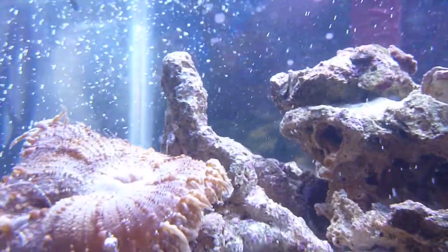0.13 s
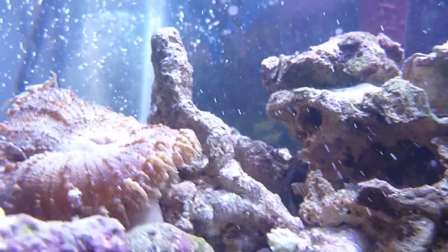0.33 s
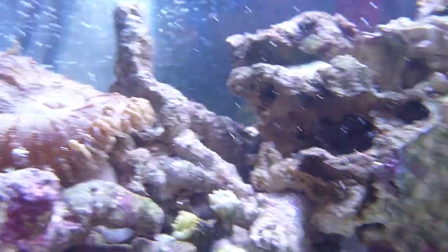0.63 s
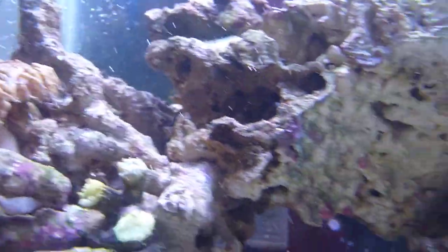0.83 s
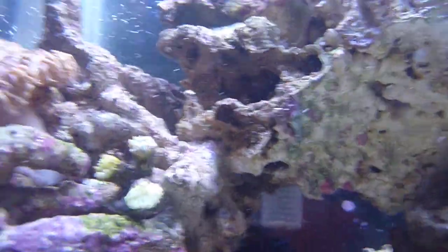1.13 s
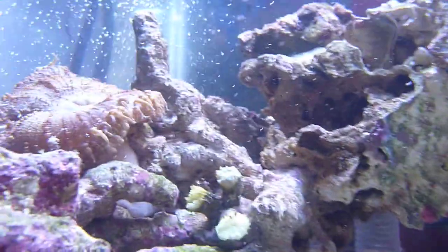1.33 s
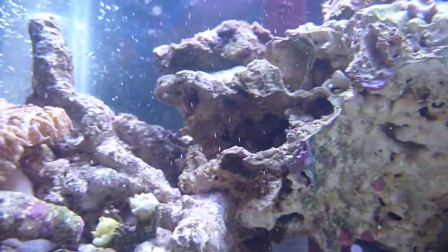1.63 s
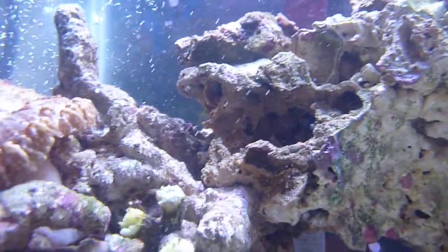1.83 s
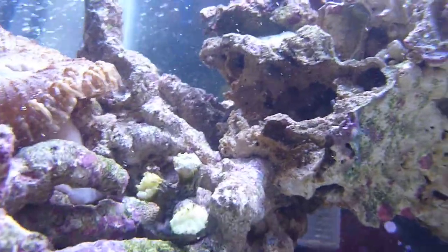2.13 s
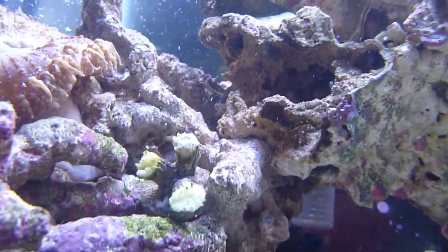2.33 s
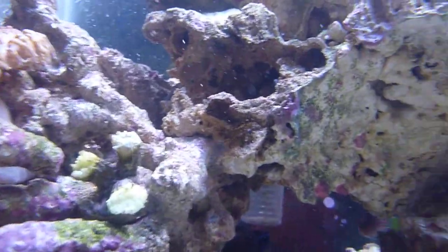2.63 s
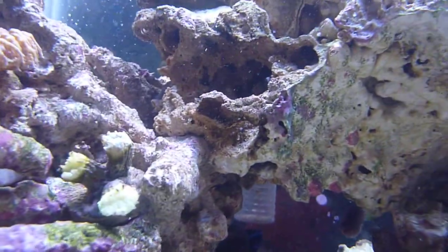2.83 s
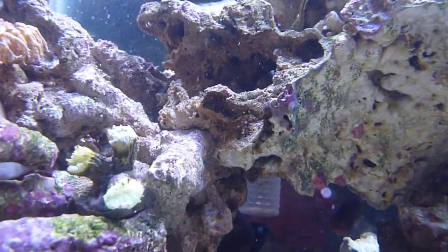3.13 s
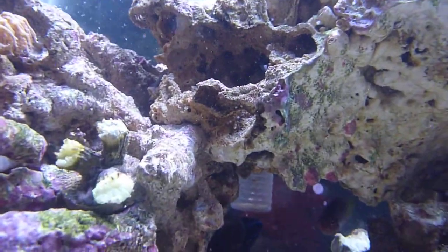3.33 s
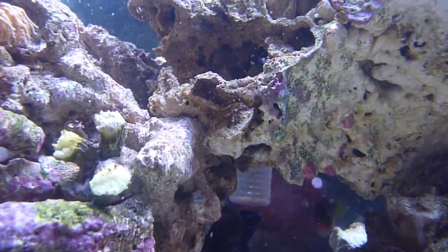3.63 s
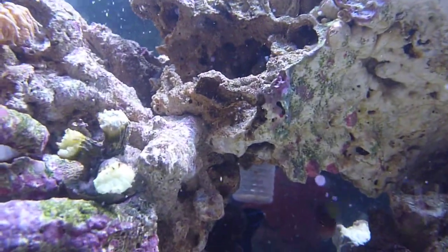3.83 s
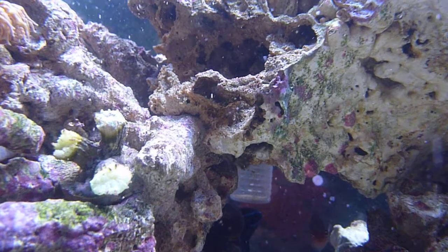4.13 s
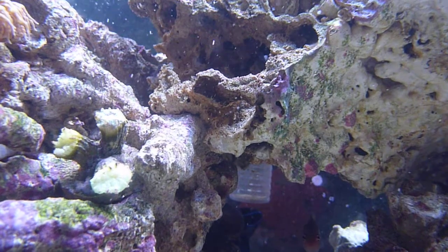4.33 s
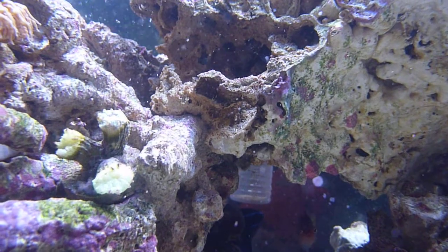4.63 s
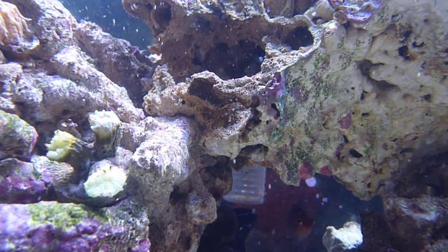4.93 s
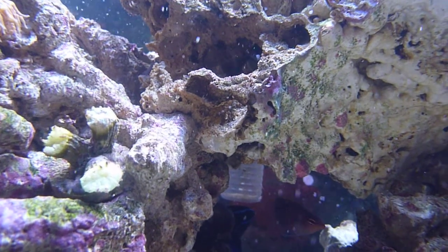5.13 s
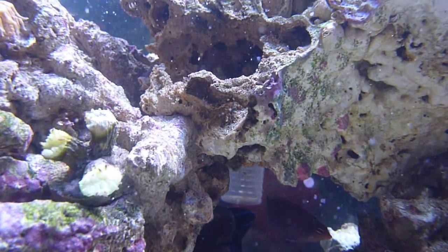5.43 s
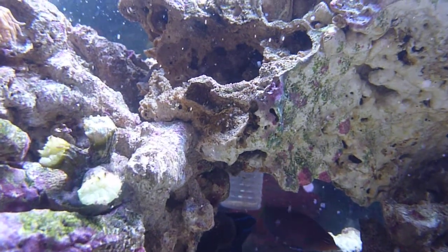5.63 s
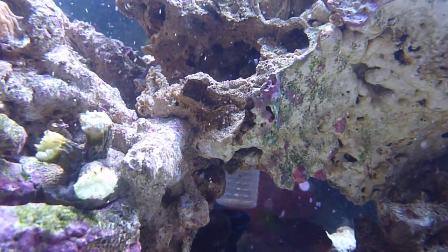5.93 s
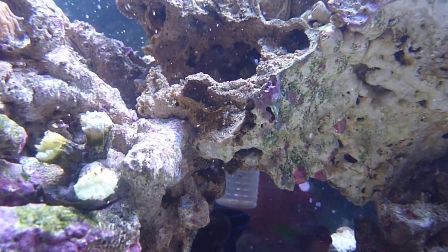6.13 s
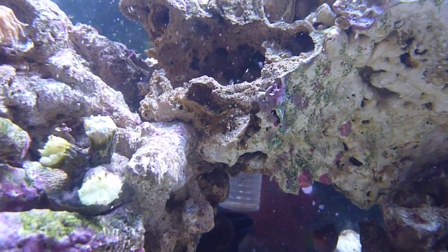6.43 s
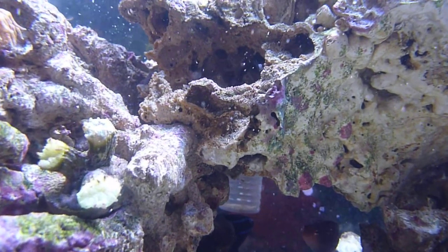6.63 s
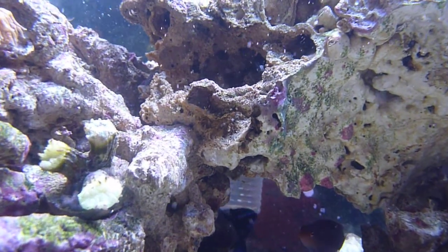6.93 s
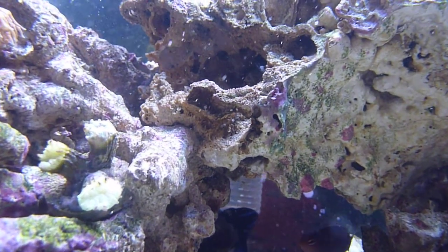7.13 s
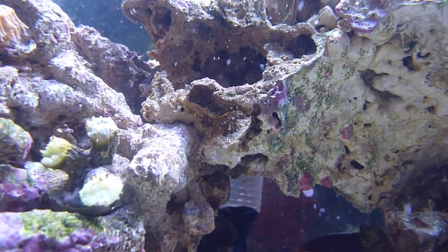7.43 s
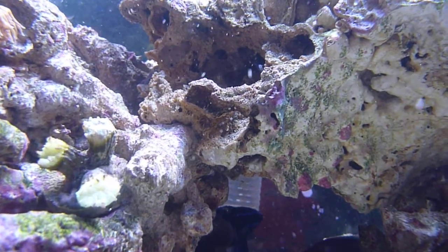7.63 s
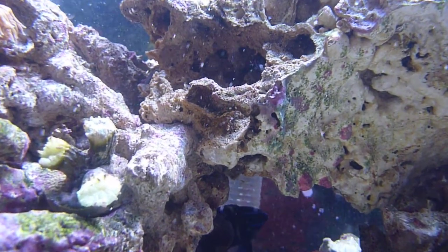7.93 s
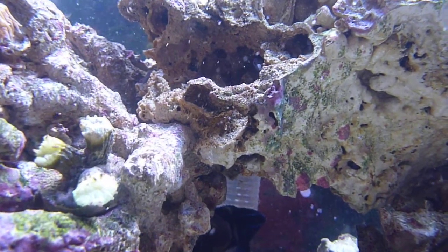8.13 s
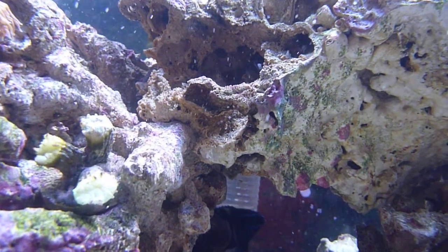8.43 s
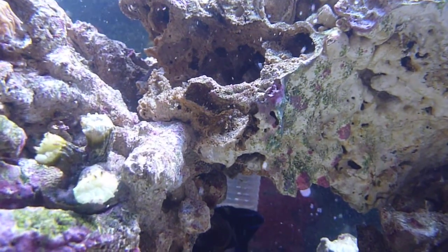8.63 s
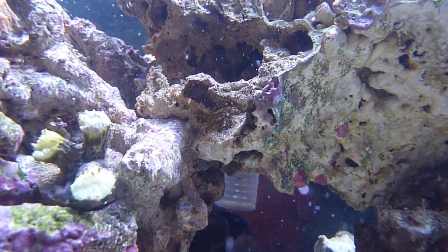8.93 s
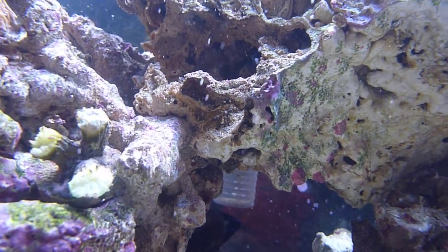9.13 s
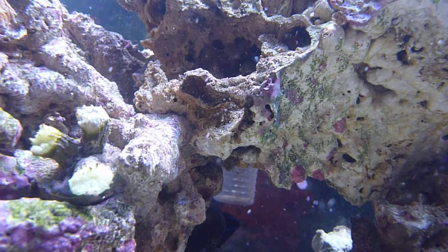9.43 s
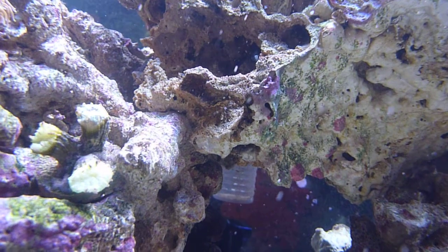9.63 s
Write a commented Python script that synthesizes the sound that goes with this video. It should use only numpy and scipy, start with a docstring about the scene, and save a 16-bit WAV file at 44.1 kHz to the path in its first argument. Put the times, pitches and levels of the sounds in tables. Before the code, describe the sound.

Underwater in a reef tank, dense bubbles pip and gurgle ceaselessly over pump hum and low current rumble, with early knocks and motor whirring.

```python
"""Air bubbles pip without pause, close and far, over a mains hum and the low rumble of the current.
The place is a reef tank; the one microphone is in a waterproof camera held under water.
Bubbles are damped gliding tones with crackling splashes; pumps are mains harmonics; current is coloured noise.
The focus motor on board whirs to and fro in stepped partials, later in short rasps of ticks.
A few knocks and sharp clicks land on the housing, as thumps and damped modes."""
import sys
import numpy as np
from scipy import signal
from scipy.fft import rfft, irfft, next_fast_len
from scipy.io import wavfile
from scipy.ndimage import uniform_filter1d

SR = 44100
rng = np.random.default_rng(int(sys.argv[2]) if len(sys.argv) > 2 else 0)


def master(y):
    """Save y as 16-bit WAV."""
    cut = np.clip(np.atleast_2d(y).T, -1, 1)
    pcm = np.round(cut * 32767)  # scale
    wavfile.write(sys.argv[1], SR, pcm.astype(np.int16))


N = 430857

# All spectra give relative colour: the noise or clicks shaped by them are scaled to rms 1.
# Nearest bubbles [t/s, peak level/dB, f/Hz, swell time/s]
NEAR_BUBBLES = [(0.047, -21, 1740, 0.0019), (0.056, -22, 2120, 0.0047), (0.063, -24.0, 1650, 0.0034),
                (0.092, -24, 1910, 0.0024), (0.132, -25, 1276, 0.0048), (0.154, -24.5, 1610, 0.0079),
                (0.198, -20.5, 1600, 0.0012), (0.277, -24, 1810, 0.0061), (0.297, -24, 1870, .004),
                (0.328, -16, 1943, 0.0059), (0.332, -20, 1460, 0.001), (0.333, -29, 2640, .003),
                (0.363, -31, 2590, 0.0036), (0.424, -21.5, 1247, 0.0042), (0.544, -23.5, 1327, 0.0058),
                (0.616, -22.5, 2220, 0.0034), (0.63, -46, 3190, 0.0019), (0.64, -24, 1660, 0.0057),
                (0.64, -17.5, 1370.0, 0.0042), (0.748, -24.5, 2470.0, 0.0036), (0.778, -26.5, 2390, 0.0095),
                (0.789, -23, 2200, 0.0028), (0.878, -25, 1680, 0.0035), (0.989, -27, 2680, 0.0026),
                (1.369, -28, 2350, 0.0028), (1.413, -22.5, 2170, 0.0014), (1.499, -24, 2380, 0.0051),
                (1.517, -17.5, 2300, 0.0038), (1.518, -23, 1960, 0.0025), (1.569, -27, 2450, 0.0043),
                (1.598, -28, 2500, 0.0027), (1.645, -33, 2660, 0.0037), (1.648, -56, 6100, 0.002),
                (1.746, -23.5, 2260, 0.0019), (1.955, -30, 2700, .003), (2.016, -21, 2290.0, 0.0053),
                (2.049, -10.5, 1790, 0.0039), (2.092, -22.5, 2570, 0.002), (2.091, -23, 1330, 0.0035),
                (2.112, -25, 1290, 0.0033), (2.195, -17.5, 1760, 0.007), (2.227, -20.5, 1380, 0.0014),
                (2.355, -22.5, 2140, 0.0019), (2.374, -27, 1850, 0.0056), (2.617, -23, 1900, 0.01),
                (2.712, -19.5, 1620, 0.0015), (2.766, -28, 2300, .003), (2.833, -19, 2080, 0.0019),
                (2.881, -23, 2130, 0.0021), (2.973, -27, 2440, 0.0025), (2.975, -18.5, 1670, 0.0014),
                (3.04, -25, 1690.0, 0.0024), (3.112, -13, 2440, 0.0038), (3.127, -22, 2380, 0.0056),
                (3.157, -20, 2526, 0.0046), (3.198, -29, 2360, .003), (3.269, -49, 3400, 0.002),
                (3.351, -21, 2020, 0.00091), (3.44, -27.5, 2440, 0.0026), (3.483, -21.5, 1947, 0.0037),
                (3.533, -19.5, 1936, 0.0044), (3.615, -24, 2090, 0.0031), (3.633, -17, 2180, 0.0017),
                (3.642, -16.5, 2170, 0.0031), (3.649, -27.5, 2090, 0.01), (3.665, -27, 1710, 0.003),
                (3.782, -25, 2106, 0.0041), (3.909, -32, 2150.0, 0.0011), (3.909, -18.5, 1360, 0.0027),
                (3.91, -7.5, 1677, 0.0056), (4.01, -22.5, 2360, 0.0018), (4.049, -23, 1580, 0.0037),
                (4.149, -54, 4770, 0.0017), (4.178, -19.5, 2160, 0.0043), (4.183, -32, 2610, 0.0036),
                (4.244, -26, 2330, 0.0037), (4.262, -24, 1930, 0.0037), (4.262, -21, 2225, 0.0052),
                (4.285, -12.5, 1910, 0.0065), (4.297, -26, 1850, 0.0038), (4.299, -26, 2300, .003),
                (4.329, -21, 2170, 0.0025), (4.636, -24, 2250, 0.0041), (4.744, -26, 1294, 0.0066),
                (4.747, -22, 2300, 0.0024), (4.758, -24, 2260.0, 0.0024), (4.768, -26.5, 2050, 0.007),
                (4.851, -29.5, 1980, 0.0054), (4.927, -24, 1990, 0.0035), (4.969, -35, 2770, 0.0041),
                (4.969, -28, 1340, 0.0034), (5.141, -15.5, 2210, 0.0034), (5.167, -18.5, 2620, 0.0035),
                (5.18, -24.5, 2390, 0.0083), (5.214, -29, 2480, .003), (5.22, -19.5, 2230.0, 0.0012),
                (5.232, -23.5, 1930, 0.0035), (5.291, -18, 1626, 0.004), (5.293, -10.5, 2000, 0.0025),
                (5.299, -22.5, 1950, 0.0056), (5.373, -34, 2690, 0.0038), (5.395, -28, 2410, 0.0037),
                (5.48, -30.5, 2470, 0.0035), (5.611, -28, 2530, 0.0039), (5.749, -17, 2170, 0.0036),
                (5.759, -26, 1840, 0.005), (5.76, -20.5, 2020, 0.0066), (5.907, -21.5, 2300, 0.005),
                (5.908, -21.5, 2550, 0.002), (5.963, -22, 2410, 0.0039), (6.006, -22, 2290, 0.0047),
                (6.011, -16.5, 1940, 0.0048), (6.05, -15.5, 1724, 0.0047), (6.051, -19, 1950, 0.0038),
                (6.133, -30, 2670, 0.0038), (6.155, -25, 2120, 0.0024), (6.328, -24, 2530, 0.0082),
                (6.376, -29, 1790, 0.0051), (6.379, -29, 2540, 0.0028), (6.441, -25, 1360, 0.0038),
                (6.441, -26, 2170, .003), (6.442, -21, 1755, 0.0041), (6.452, -11.0, 1797, 0.0073),
                (6.462, -22, 1340, 0.0047), (6.464, -18, 2280, 0.0018), (6.479, -19, 1740, 0.0058),
                (6.504, -25.5, 1980, 0.0082), (6.692, -27.5, 2410, 0.0034), (6.825, -50.5, 4680, 0.0017),
                (6.926, -30, 2540, 0.0039), (6.947, -9.5, 1460, 0.0018), (6.952, -18.5, 1446, 0.0073),
                (6.961, -29, 2430, 0.0036), (6.984, -23, 1410, 0.0024), (6.988, -23, 2400, 0.007),
                (6.988, -16, 2120, 0.0044), (6.99, -20, 1920, 0.0024), (7.087, -19, 2190, 0.0037),
                (7.109, -24.5, 1880, 0.004), (7.213, -50, 3300, 0.0022), (7.225, -16.5, 1490, 0.0075),
                (7.227, -27, 2640, 0.0025), (7.384, -17.5, 1940, 0.0039), (7.453, -47, 4910, 0.0015),
                (7.723, -39, 3020, 0.0022), (7.751, -24.5, 1920, 0.011), (7.753, -18, 2230, 0.0018),
                (7.79, -25.5, 1250, 0.005), (7.793, -25.5, 2440, 0.0035), (7.794, -48, 3140, 0.002),
                (7.801, -27, 2360, 0.0035), (7.972, -51, 4390, 0.0015), (7.976, -25.5, 1260, .004),
                (7.979, -30, 2710, .003), (7.983, -21.5, 1590, 0.0037), (8.099, -24.5, 1840, 0.0046),
                (8.297, -18, 2380, 0.0041), (8.357, -28, 2390, 0.0034), (8.399, -45, 3230, 0.0018),
                (8.496, -27.5, 2000, 0.0058), (8.605, -20, 1310, 0.0055), (8.606, -17.5, 1720, 0.0024),
                (8.607, -15, 2080, 0.0035), (8.634, -19, 1760, 0.0021), (8.635, -25, 1245, 0.0034),
                (8.681, -24, 1930, 0.0035), (8.696, -27, 2070, 0.0069), (8.729, -21, 1250, 0.0027),
                (8.731, -14.5, 1943, 0.005), (8.734, -16.5, 1600, 0.0016), (8.761, -26, 1510, .003),
                (8.945, -20, 2090, 0.0028), (8.945, -22, 2350, 0.0023), (9.001, -31, 2500, 0.0039),
                (9.029, -13.5, 2130, 0.0016), (9.033, -12, 1690, 0.0029), (9.049, -22, 1660, 0.0018),
                (9.112, -20, 1860, 0.0022), (9.146, -26, 1770, 0.0022), (9.156, -26.5, 1753, 0.0084),
                (9.199, -52.5, 4610, 0.0015), (9.386, -19.5, 1986, 0.0052), (9.541, -24, 1520, 0.0054),
                (9.542, -8, 2014, 0.0031), (9.675, -17.5, 2430, 0.0038), (9.705, -28, 1180, .003)]
# Splash of a bubble being born, spectrum [f/Hz, level/dB per Hz]
SPLASH_SPECTRUM = [(700, -26), (1100, -1), (1400, 2.5), (2000, 5.5), (2500, -1), (2800, -8.5),
                   (3150, -26.5), (4500, -31), (6800, -37), (7600, -67.5)]
# Blur of far bubbles, spectrum [f/Hz, level/dB per Hz]
FIZZ_SPECTRUM = [(600, -17.5), (900, -10.5), (1250, -5), (1550, -4.5), (2000, -3.5), (2450, -14.5),
                 (2750, -11.5), (3100, -28), (4000, -50.5)]
# Vigour of the distant bubbling [t/s, level/dB]
VIGOUR_CURVE = [(0.0, -34.5), (0.63, -32), (1.09, -36.5), (1.66, -36), (2.47, -35.5), (2.77, -33.5),
                (3.13, -38), (3.56, -33.5), (4.57, -37.5), (5.22, -34.5), (5.44, -38.5), (6.17, -33),
                (6.61, -35.5), (7.48, -35.5), (7.94, -34.5), (8.22, -37), (8.82, -34.5), (9.77, -33.5)]
# Lowest water resonance, shifting as the camera drifts [t/s, f/Hz]
WATER_MODE_CURVE = [(0, 1270), (.2, 1278), (.45, 1266), (.65, 1425), (1.1, 1312), (1.85, 1260), (2.1, 1313),
                    (2.45, 1262), (2.72, 1344), (3, 1202), (3.35, 1210), (3.55, 1325), (3.75, 1290),
                    (3.97, 1354), (4.2, 1255), (4.32, 1145), (4.55, 1152), (4.75, 1298), (5.2, 1407),
                    (5.5, 1291), (5.85, 1394), (6.05, 1343), (6.3, 1410), (6.6, 1316), (6.85, 1332),
                    (7.1, 1228), (7.3, 1107), (7.6, 1280), (7.9, 1242), (8.3, 1095), (8.55, 1273),
                    (8.95, 1143), (9.35, 1063), (9.77, 1225)]
# Higher water resonances, around which they wander [f/Hz, level/dB]
UPPER_WATER_MODES = [(1780, -14), (2060, -9.5), (2400, -12.5)]
# Fine spray of the smallest bubbles, spectrum [f/Hz, level/dB per Hz]
SPRAY_SPECTRUM = [(2600, -8.5), (3300, 4), (4000, -1), (5000, -6), (6500, -17), (7400, -18), (8000, -44.5)]
# Brief swishes of spray close by [t of the middle/s, length/s, level/dB]
SWISH_TIMES = [(0.535, 0.037, -50.5), (0.6, 0.082, -55), (0.948, 0.045, -55), (1.35, 0.053, -58),
               (1.74, 0.054, -55), (2.842, 0.025, -48.5), (3.368, 0.28, -57)]
# Knocks on the housing; clacks and snap are relative to the thump
# [t/s, level/dB, thump f/Hz, low clack level/dB, high clack level/dB, snap level/dB]
KNOCK_TIMES = [(0.5707, -11, 483, 6.5, 6, -50), (0.6549, -12, 415, 5, 7.5, -59),
               (1.058, -6, 477, 12, 13.5, 0.5), (1.1018, -18.5, 330, 6, -9, -45),
               (1.156, -12, 170, -14, -14, -45), (1.1581, -2.5, 817, 7, -27, -28),
               (1.177, -4.5, 477, 13, 15.5, 4.5), (1.255, -20, 380, -16, -2, -39),
               (1.2712, -13.5, 473, 6.5, 5, -49), (2.476, -7.5, 423, -25, -30, -58),
               (5.988, -14.5, 366, -14, -13, -45), (5.993, -26, 596, 17, 18.5, -56),
               (6.1733, -9, 465, 1.5, -8, -65), (6.2342, -20, 330, -8, -19, -43),
               (6.539, -28, 254, 10, 0, -9.5), (8.1757, -44, 400, 7, 5, 15),
               (8.466, -11.5, 277, 2, -6, -50)]
# Housing modes damped by the water; the first two are the low and high clack [f/Hz, level/dB, t60/s]
HOUSING_MODES = [(1430, 1.5, 0.0033), (2204, 1.5, 0.0036), (3600, 6.5, 0.0014), (5270, 3.5, 0.0035),
                 (7800, 2.5, 0.0022)]
# Housing panel ringing on after a thump [f/Hz, level relative to the thump/dB, t60/s]
PANEL_MODE = (470, -14.5, .016)
# Housing nudged in the hand [t/s, peak level/dB, f/Hz, swell time/s]
HAND_NUDGE = (1.318, -35, 41, .02)
# Focus motor partials, before trim and fade [multiple of step rate, level out/dB, level back/dB]
MOTOR_PARTIALS = [(1, -52.5, -48.5), (2, -40, -48.5), (3, -52.5, -39), (4, -53, -46), (4.5, -57, -52),
                  (6, -56, -66.5), (7, -73, -64)]
# Short focus corrections, before trim [t of the middle/s, level/dB]
RASP_TIMES = [(2.815, -39), (2.866, -47), (2.921, -43), (3.039, -43), (3.577, -39), (3.653, -36.5),
              (3.777, -37.5), (3.844, -38), (4.309, -46), (4.4, -40), (4.613, -38), (4.729, -36.5),
              (4.925, -39), (5.058, -40.5), (5.157, -40.5), (5.246, -38), (5.405, -39), (5.598, -40.5),
              (5.68, -39), (5.739, -40.5), (5.932, -42), (6.109, -40.5), (6.317, -38), (6.55, -43),
              (6.634, -41), (6.77, -39), (6.977, -39.5), (7.141, -37.5), (7.293, -42), (7.394, -40),
              (7.55, -39.5), (7.81, -37.5), (7.884, -38), (8.052, -37.5), (8.185, -36), (8.415, -38),
              (8.611, -39.5), (8.777, -39.5), (8.902, -42), (9.014, -41.5), (9.167, -39.5), (9.34, -42)]
# Lens drive rattle, spectrum [f/Hz, level/dB per Hz]
RASP_SPECTRUM = [(500, -30), (700, -8.5), (820, -2), (1050, 3.5), (1350, -4.5), (1750, 1.5), (2300, -4.5),
                 (2750, -6.5), (3200, -28), (3800, -24), (4800, -29), (7000, -37), (8000, -67.5)]
# Pump hum harmonics [multiple of the mains, level relative to the hum curve/dB]
HUM_HARMONICS = [(1, -11), (2, 0.68), (3, -10), (4, -19), (6, -14.5)]
# Hum as the camera drifts about the tank [t/s, level/dB]
HUM_CURVE = [(0, -28.5), (.5, -29.5), (1.1, -32), (3, -31.5), (6, -31), (8.2, -29.5), (9.77, -30.5)]
# Rumble of the current, spectrum [f/Hz, level/dB per Hz]
CURRENT_SPECTRUM = [(25, -26.5), (50, -14), (68, -4), (83, -11), (98, -0.5), (140, 2), (165, -2.5),
                    (205, 1), (250, -7), (295, -0.5), (370, -10), (480, -11), (650, -23.5), (900, -29),
                    (1400, -33.5)]
# Strength of the current at the housing, before trim [t/s, level/dB]
CURRENT_CURVE = [(0, -34.5), (.3, -33.5), (.65, -40.5), (1.33, -36.5), (1.55, -41), (2.3, -38),
                 (4.6, -39.5), (7, -37.5), (8.5, -37), (9.77, -39)]
# Microphone hiss, spectrum [f/Hz, level/dB per Hz]
HISS_SPECTRUM = [(2000, 4), (4800, 3), (6000, 3.5), (7100, -4.5), (7600, -16.5), (8100, -34), (15000, -43)]

RING_WIDTH_HZ = 26  # decay setting of each water resonance
DEAD_HZ = 2800  # between its modes the housing hardly moves
STEP_HZ = 479.5  # motor steps per second
HUNT_PERIOD_S, MOVE_S, HUNT_END_S = .13347, .038, 2.79  # to and fro; one move; last moves start before this
MAINS_HZ, WHINE_HZ, WHINE_DB = 60.0, 2991, -71.5
NOTCH_HZ = 5430  # narrow hollow in the treble
OVERLOAD = .73  # input ceiling, full scale = 1
TOP_HOLLOW_HZ, TOP_ROLLOFF_HZ, CUTOFF_HZ = 9800, 10500, 17200  # recorder's top end


def near_bubbles():
    """The bubbles close by, each heard as a damped pip of its own with a small splash."""
    return bubbling(np.array(NEAR_BUBBLES), splash_db=-19.0, splash_s=0.0028, glide=-0.0027, scoop=0.049)


def passing_bubbles(level_db=-2.5, size_db=0.7, low_hz=1450, high_hz=2500, swell_s=0.0028,
                    gap_s=.011, slide=.045, pitch_spread=0.027, count=210, size=4):
    """A little farther off, air pinches off in uneven chains; pitch slides up or down along each."""
    when, pitch, direction = rng.random((count, 3)).T[:, :, None]
    chance = np.clip(rng.standard_normal((count, size, 4)), -2, 1.5)
    loud, damping, detune, late = chance.transpose(2, 0, 1)
    place = np.arange(size) - (size - 1) / 2
    chain_s = (np.arange(count)[:, None] + when) / count * N / SR
    s = np.abs(chain_s + gap_s * (place + late / 2))
    chain_hz = low_hz + (high_hz - low_hz) * pitch
    hz = chain_hz * np.exp(slide * (2 * direction - 1) * place + pitch_spread * detune)
    rows = np.stack([s, level_db + size_db * loud, hz, swell_s * np.exp(damping / 2)], axis=-1)
    return bubbling(rows[hz < high_hz], splash_db=-8.0, splash_s=0.0021,
                    glide=-0.0022, scoop=0.071, glide_spread=0.017)


def swarm(centre_hz=2000, pitch_spread=.2, top_hz=2550, fall_db_per_octave=63.0,
          size_db=2.0, cycles=11.2, count=1300):
    """Small bubbles born at random, weaker the higher they sound above the top pitch; rms 1."""
    pitch, size, damping = rng.standard_normal((count, 3)).T
    hz = centre_hz * np.exp(pitch_spread * pitch)
    octaves_above = np.maximum(np.log2(hz / top_hz), 0)
    db = size_db * np.minimum(size, 1) - fall_db_per_octave * octaves_above
    swell = cycles / hz * np.exp(damping / 3)
    rows = np.c_[rng.uniform(0, N / SR, count), db, hz, swell]
    return rms_one(bubbling(rows, splash_db=-7.5, splash_s=0.0025, glide=-0.0026, scoop=0.078))


def bubbling(rows, splash_db, splash_s, glide, scoop, glide_spread=0.0032):
    """Each bubble [t/s, level/dB, f/Hz, swell/s] is a gliding tone with a crackling splash at its start."""
    tones, splashes = np.zeros(N), np.zeros(N)
    age = np.arange(SR // 25) / SR / splash_s
    burst = age * np.exp(1 - age)
    chance = rng.uniform(-1, 1, (len(rows), 2))
    for (s, db, hz, swell), (bend, rise) in zip(rows, chance):
        tone = pip(hz, swell, glide + glide_spread * bend, scoop * (1 + rise))
        add(tones, s, from_db(db) * tone)
        add(splashes, s, from_db(db + splash_db) * burst)
    return tones + splashes * crackle(SPLASH_SPECTRUM, per_s=5000)


def pip(hz, swell, glide=0.0, scoop=0.0, fall=1.49):
    """A damped tone scoops up to pitch as it swells, then glides as it dies; envelope peak 1."""
    age = np.arange(int(5 * swell * SR) + 1) / SR / swell  # in swell times
    pitch = hz * (1 + glide * (age - 1) - scoop * np.exp(-2 * age))
    envelope = age * np.exp((1 - age ** fall) / fall)
    return envelope * np.sin(2 * np.pi * np.cumsum(pitch) / SR)


def water_rings(gurgle, lowest_db=-6.0, wander=.05, even_s=0.061):
    """Bubbling keeps the water's shifting resonances sounding; the lowest is evened out in level."""
    lowest = ring(gurgle, in_time(WATER_MODE_CURVE)[0])
    power = np.abs(uniform_filter1d(lowest ** 2, int(even_s * SR))) + 1e-6
    lowest = rms_one(lowest / power ** (1 / 4))  # halves the swings in dB
    upper = sum(from_db(db) * ring(gurgle, hz * np.exp(wander * drift(5)))
                for hz, db in UPPER_WATER_MODES)
    return from_db(lowest_db) * lowest + upper


def ring(x, hz):
    """A narrow resonance whose centre moves, set ringing by x; rms 1."""
    carrier = np.exp(2j * np.pi * np.cumsum(hz) / SR)
    r = np.exp(-2 * np.pi * RING_WIDTH_HZ / SR)
    # shift the centre down to zero, smooth, and shift back up
    smoothed = signal.lfilter([1 - r], [1, -r], x / carrier)
    return rms_one((smoothed * carrier).real)


def spray(level_db=-34.5, gust_db=2.5, swell_db=0.9):
    """The smallest bubbles crackle faintly, tick by tick, in quick gusts on slower swells."""
    gain = from_db(level_db + gust_db * drift(21) + swell_db * drift(6.0))
    return gain * crackle(SPRAY_SPECTRUM, per_s=1500)


def swishes():
    """Puffs of fine bubbles brush past the housing: dense clicks under short smooth envelopes."""
    gate = np.zeros(N)
    for s, length, db in SWISH_TIMES:
        add(gate, s - length / 2, from_db(db) * signal.windows.hann(int(length * SR)))
    return gate * crackle(SPRAY_SPECTRUM, per_s=6000)


def knocks(thump_cycles=0.55, low_cut_hz=200, clack_cut_hz=2600, light_cut_hz=5300, hard_cut_hz=8200):
    """Each contact thumps and rings the panel, two clack modes and a bright snap in its own mix."""
    out, t = np.zeros(N), np.arange(SR // 20) / SR
    modes = [(-1) ** k * damped_mode(t, *mode) for k, mode in enumerate(HOUSING_MODES)]
    low, high, *bright = modes
    panel = damped_mode(t, *PANEL_MODE)
    soften = signal.butter(6, clack_cut_hz, fs=SR, output="sos")
    for s, db, hz, low_db, high_db, snap_db in KNOCK_TIMES:
        # a weaker snap is duller
        cut_hz = np.interp(db + snap_db, [-25, -8], [light_cut_hz, hard_cut_hz])
        snap = signal.sosfilt(signal.butter(12, cut_hz, fs=SR, output="sos"), sum(bright))
        clack = signal.sosfilt(soften, from_db(low_db) * low + from_db(high_db) * high)
        add(out, s, from_db(db) * pip(hz, thump_cycles / hz))
        add(out, s, from_db(db) * (panel - clack - from_db(snap_db) * snap))
    out = signal.sosfilt(signal.butter(2, low_cut_hz, "high", fs=SR, output="sos"), out)
    out = signal.lfilter(*signal.iirnotch(DEAD_HZ, 5, fs=SR), out)
    s, db, hz, swell = HAND_NUDGE
    add(out, s, from_db(db) * pip(hz, swell))
    return out


def damped_mode(t, hz, db, t60):
    """One mode of the housing, dying by 60 dB in t60."""
    return from_db(db - 60 * t / t60) * np.sin(2 * np.pi * hz * t)


def focus_hunt(level_db=0.4, uneven_db=1.5, rattle_db=-44.0, jitter=0.1, fade_db_per_s=1.5):
    """A stepper moves the lens out and back, a different buzz each way, with uneven steps, slowly fading."""
    out, moving = np.zeros(N), np.zeros(N)
    gate = signal.windows.tukey(int(MOVE_S * SR), .35)
    turn = 2 * np.pi * STEP_HZ * np.arange(N) / SR + jitter * drift(200)
    phases = rng.uniform(0, 2 * np.pi, len(MOTOR_PARTIALS))
    starts = np.maximum(np.arange(0, HUNT_END_S, HUNT_PERIOD_S / 2) - MOVE_S / 10, 0)
    for move, s in enumerate(starts):
        add(moving, s, gate)
        angle = turn[int(s * SR):][:len(gate)]
        fade_db = fade_db_per_s * (HUNT_END_S / 2 - s)
        for (k, *levels), phase in zip(MOTOR_PARTIALS, phases):
            gain = from_db(levels[move % 2] + level_db + fade_db + uneven_db * rng.normal())
            add(out, s, gain * gate * np.sqrt(2) * np.sin(k * angle + phase))
    return out + from_db(rattle_db) * moving * noise(RASP_SPECTRUM)


def focus_rasps(level_db=3.5, length_s=0.035, edge_share=.4, ticks_per_s=2400, stagger=.3):
    """Brief runs of the lens drive: a rattle of ticks at a jittering rate, each up or down by chance."""
    gate, shape = np.zeros(N), signal.windows.tukey(int(length_s * SR), edge_share)
    for s, db in RASP_TIMES:
        add(gate, s - length_s / 2, from_db(db + level_db) * shape)
    travel = np.cumsum(ticks_per_s * np.exp(stagger * drift(200))) / SR
    # one tick each time the travel passes a whole number
    ticks = np.diff(np.floor(travel), prepend=0) * rng.choice([-1, 1], N)
    return gate * coloured(ticks, RASP_SPECTRUM)


def pumps():
    """Mains-driven pumps hum in harmonics that follow one level curve, beside a thin, steady whine."""
    t, (level_db,) = np.arange(N) / SR, in_time(HUM_CURVE)
    lines = [(k * MAINS_HZ, db + level_db) for k, db in HUM_HARMONICS]
    lines.append((WHINE_HZ, WHINE_DB))
    return sum(np.sqrt(2) * from_db(db) * np.sin(2 * np.pi * hz * t + rng.uniform(0, 2 * np.pi))
               for hz, db in lines)


def current(level_db=2.5):
    """The current rumbles at the housing: low coloured noise of changing strength."""
    (rumble_db,) = in_time(CURRENT_CURVE)
    return from_db(rumble_db + level_db) * noise(CURRENT_SPECTRUM)


def microphone_hiss(level_db=-67.5):
    """Steady coloured noise of the microphone."""
    return from_db(level_db) * noise(HISS_SPECTRUM)


def noise(spectrum):
    """Smooth noise of a given colour, rms 1."""
    return coloured(rng.standard_normal(N), spectrum)


def crackle(spectrum, per_s):
    """Random clicks of a given colour, rms 1."""
    clicks = rng.standard_normal(N) * (rng.random(N) < per_s / SR)
    return coloured(clicks, spectrum)


def coloured(x, spectrum):
    """Give a white excitation its colour, with falling skirts beyond the table's ends; rms 1."""
    hz, db = np.transpose(spectrum)
    size = next_fast_len(N, True)
    f = np.maximum(np.fft.rfftfreq(size, 1 / SR), 1)
    skirts = np.minimum(f / hz[0], 1) ** 2 * np.minimum(hz[-1] / f, 1) ** 4
    gain = from_db(np.interp(np.log(f), np.log(hz), db)) * skirts
    return rms_one(irfft(rfft(x, size) * gain, size)[:N])


def drift(rate):
    """Chance values, rate per second, joined by straight lines; rms 1."""
    knots = rng.standard_normal(2048)
    return rms_one(np.interp(np.arange(N) / SR * rate, np.arange(len(knots)), knots))


def in_time(rows):
    """Each column of a curve, sample by sample."""
    s, *columns = np.transpose(rows)
    return [np.interp(np.arange(N) / SR, s, column) for column in columns]


def add(out, s, sound):
    """Mix a short sound in at time s."""
    i = int(np.clip(round(s * SR), 0, N - 1))
    out[i:i + len(sound)] += sound[:N - i]


def from_db(db):
    """Decibels to gain."""
    return 10 ** (np.asarray(db) / 20)


def rms_one(x):
    """Scale to rms 1."""
    return x / np.sqrt(np.mean(x ** 2) + 1e-20)


def scene(swarm_db=-11.0, fizz_db=-14.5, churn_db=5.0, surge_db=1.8, ring_db=-3.5):
    """Everything as it reaches the one microphone; one vigour curve drives all the distant bubbling."""
    (vigour_db,) = in_time(VIGOUR_CURVE)
    surge = from_db(surge_db * drift(45))
    fizz = surge * from_db(fizz_db + churn_db * drift(60)) * noise(FIZZ_SPECTRUM)
    gurgle = fizz + passing_bubbles()
    rings = from_db(ring_db) * water_rings(gurgle)
    fine = surge * (from_db(swarm_db) * swarm() + spray())
    wash = from_db(vigour_db) * (gurgle + rings + fine)
    tank = near_bubbles() + wash + swishes() + pumps() + current()
    camera = focus_hunt() + focus_rasps() + microphone_hiss()
    bed = signal.lfilter(*signal.iirnotch(NOTCH_HZ, 15, fs=SR), tank + camera)
    fade_in = np.sin(np.pi / 2 * np.minimum(np.arange(N) / SR / .003, 1)) ** 2  # over 3 ms
    return (fade_in * bed + knocks())[None]


def record(dry, knee_db=0.5, release_db_per_s=53.0, attack_s=0.0003):
    """Sharp clicks overload the input, and the gain control ducks briefly after them; the top is dulled."""
    recovery = release_db_per_s * np.arange(N) / SR
    over = np.maximum(20 * np.log10(np.abs(dry[0]) + 1e-9) - knee_db, 0)
    # hold each peak, letting it fall at the release rate
    held = np.maximum.accumulate(over + recovery) - recovery
    r = np.exp(-1 / (attack_s * SR))
    reduction_db = signal.lfilter([1 - r], [1, -r], held)
    ducked = dry * from_db(-reduction_db)
    clipped = ducked / (1 + (ducked / OVERLOAD) ** 24) ** (1 / 24)
    hollowed = signal.lfilter(*signal.iirnotch(TOP_HOLLOW_HZ, 6, fs=SR), clipped)
    dulled = signal.sosfilt(signal.butter(2, TOP_ROLLOFF_HZ, fs=SR, output="sos"), hollowed)
    return signal.sosfilt(signal.cheby2(12, 70, CUTOFF_HZ, fs=SR, output="sos"), dulled)


dry = scene()
out = record(dry)
master(out)
```